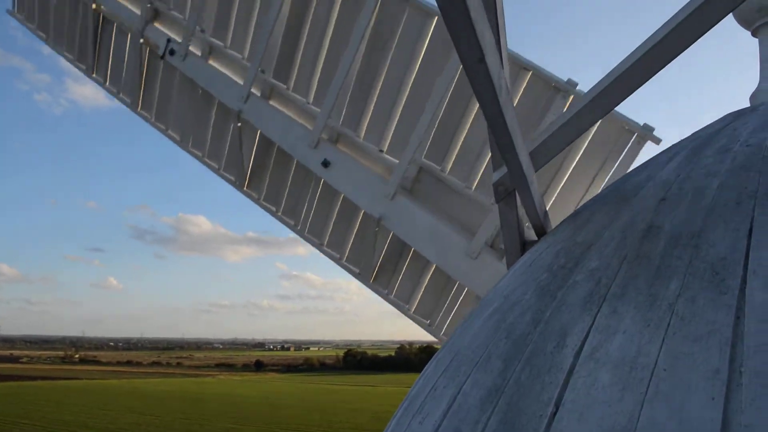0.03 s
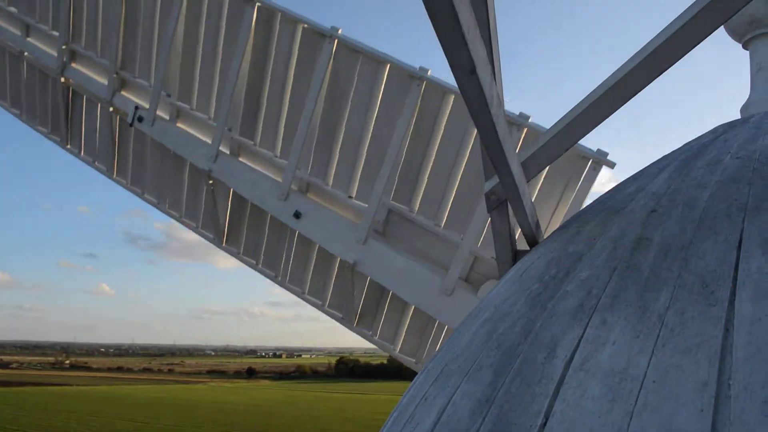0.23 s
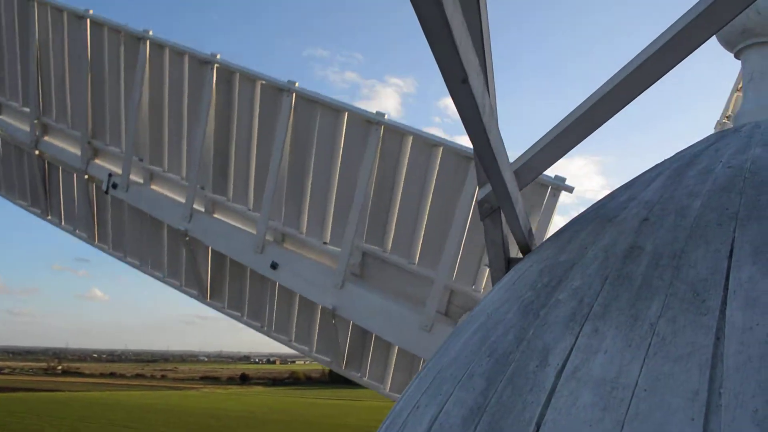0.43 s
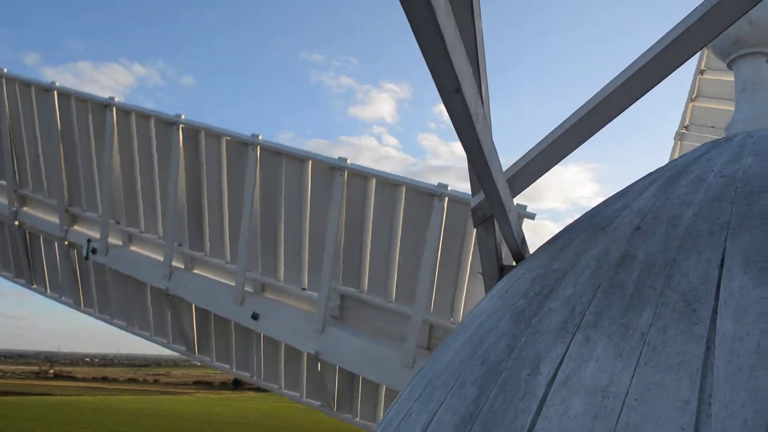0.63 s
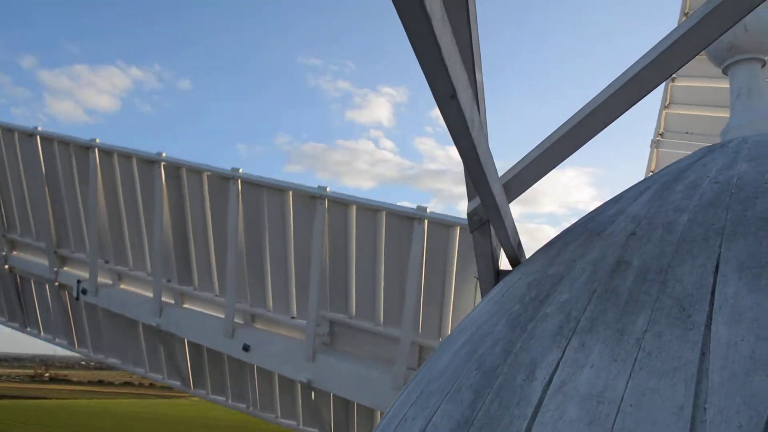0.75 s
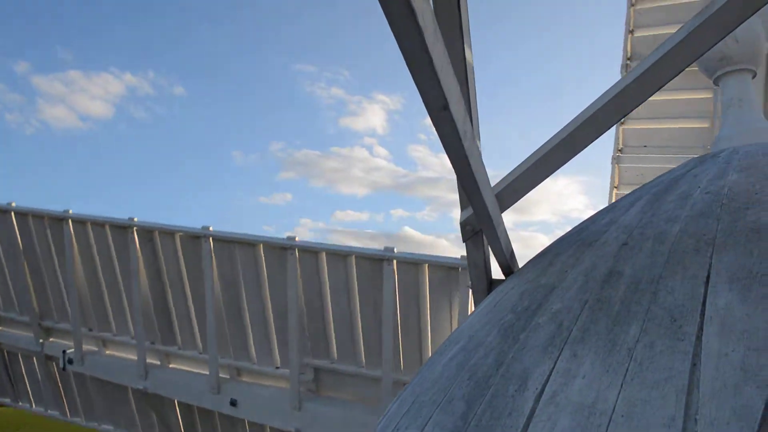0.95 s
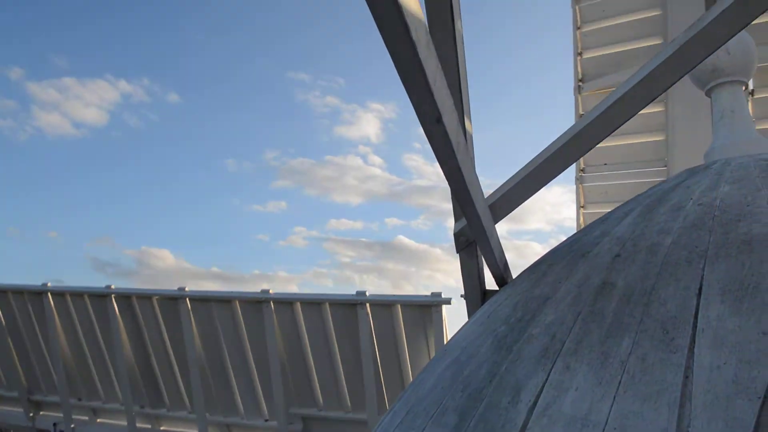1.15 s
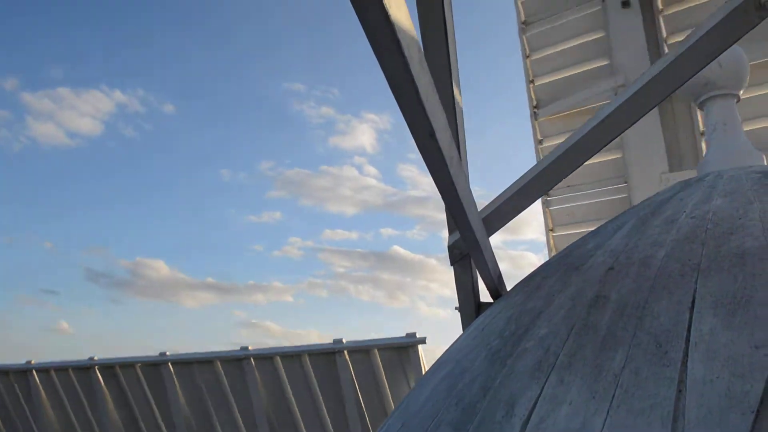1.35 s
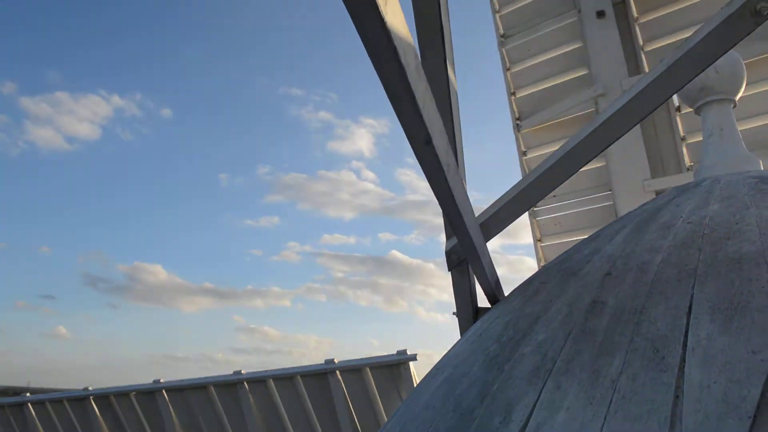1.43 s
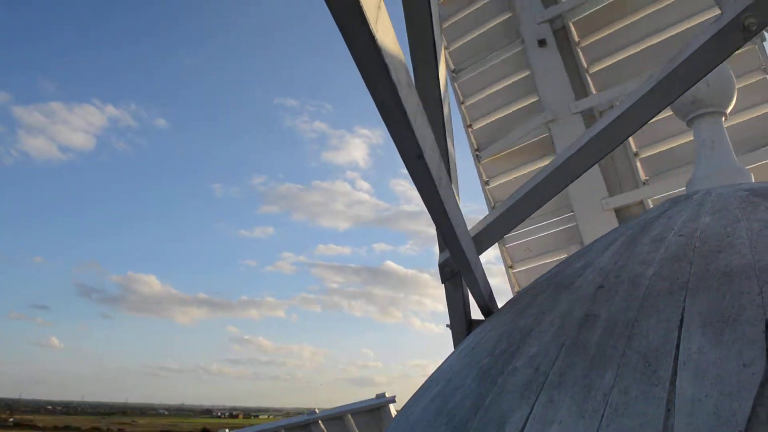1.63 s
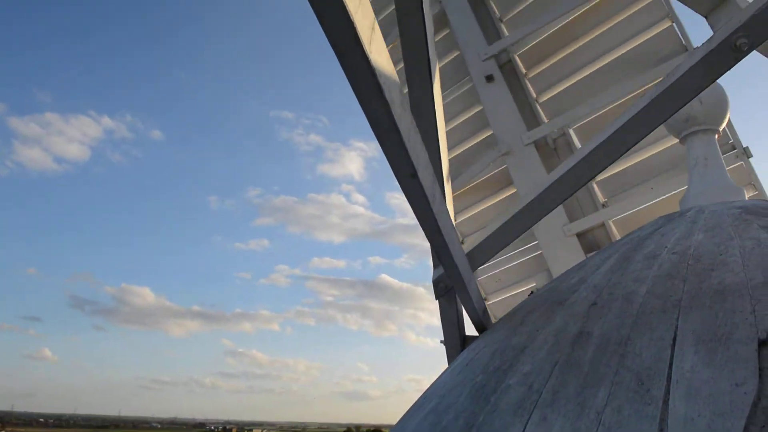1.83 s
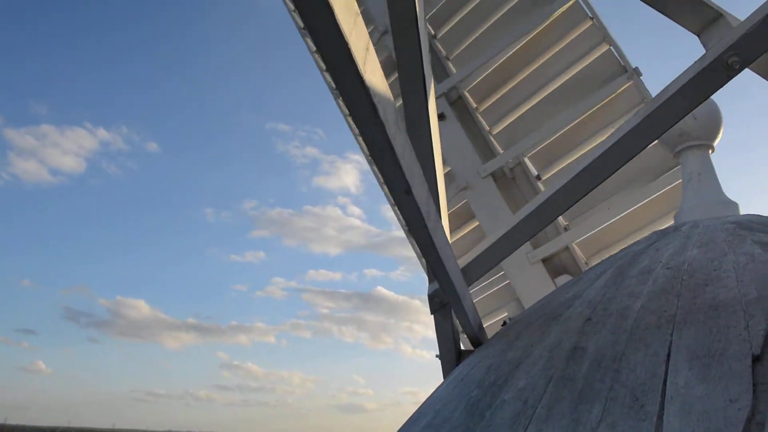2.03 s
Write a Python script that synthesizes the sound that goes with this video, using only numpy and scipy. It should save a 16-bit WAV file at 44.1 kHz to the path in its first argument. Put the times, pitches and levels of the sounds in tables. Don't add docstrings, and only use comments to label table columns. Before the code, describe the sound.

Strong wind rumbling and thumping on a microphone high on a windmill, small mechanism ticks behind

```python
import sys
import numpy as np
from scipy import signal
from scipy.fft import rfft, irfft, next_fast_len
from scipy.io import wavfile
from scipy.ndimage import uniform_filter1d

SR = 44100
rng = np.random.default_rng(int(sys.argv[2]) if len(sys.argv) > 2 else 0)


def field_ratio(decibels):
    return 10 ** (np.asarray(decibels, dtype=float) / 20)


def put_to_file(sound):
    columns = np.atleast_2d(sound).T
    safe = np.clip(columns, -1, 1)
    whole_steps = np.round(safe * 32767)
    wavfile.write(sys.argv[1], SR, whole_steps.astype(np.int16))


N = 92610

# (frequency [Hz], density [dB per Hz])
AIR_SPECTRUM = [(12, -60.5), (40, -10.5), (142, -6.5), (255, -8.5), (337, -9.5), (698, -10), (923, -7),
                (1260, -12), (16000, -47)]
# (frequency [Hz], correlation [0-1])
PORT_LIKENESS = [(60, .1), (130, .4), (290, 0.96), (640, 0.94), (1410, 0.9), (3100, 0.35), (6820, 0.35),
                 (15000, .05)]
# (pitch ratio [1], level [dB], half length [cycles of the eddy])
WHIRLS = [(.62, -4.5, 0.87), (1.01, -2, 0.9), (1.6, -8, 0.8), (2.3, -18, 0.41), (3.2, -30.5, 0.83)]
# (time [s], level [dB])
GUST_STRENGTH = [(0, -35.5), (.16, -32.5), (.185, -63.5), (.21, -10.5), (.272, -19), (.29, -31),
                 (.375, -34), (.395, -18.5), (.45, -25.5), (.475, -13.5), (.522, -15.5), (.532, -26),
                 (.8, -39.5), (.905, -41.5), (.93, -25.5), (1.15, -37.5), (1.18, -39.5), (1.65, -51.5)]
# (time [s], level [dB], pitch [Hz])
MAIN_LEFT = [(0.062, -21, 208), (0.2097, 0, 409), (0.2242, 0.5, 442), (0.2383, -3.5, 714), (0.269, -2, 428),
             (0.292, -10.5, 279), (0.315, -7, 412), (0.351, -13.5, 395), (0.396, -11, 379),
             (0.409, -13.5, 350), (0.4726, 1.5, 520), (0.4915, 5, 400), (0.512, -11.5, 720),
             (0.521, -8, 470), (0.572, -8, 378), (0.661, -23.5, 196), (0.738, -28, 520),
             (0.771, -14.5, 187), (0.793, -25, 225), (0.9285, -10.5, 260), (0.951, -19, 500),
             (0.97, -19, 230), (0.988, -16, 485), (1.065, -15, 210), (1.117, -17.5, 190),
             (1.133, -11.5, 420), (1.1435, -8.5, 250), (1.192, -25.5, 184), (1.361, -21, 144),
             (1.448, -13.5, 225)]
MAIN_RIGHT = [(0.049, -28.5, 247), (0.068, -23, 276), (0.121, -22, 215), (0.216, -8, 392), (0.227, 2, 452),
              (0.2465, 1.5, 467), (0.276, -11, 390), (0.305, -19.5, 314), (0.317, -15.5, 176),
              (0.33, -14.5, 196), (0.4, -13.5, 500), (0.4794, -2.5, 514), (0.4944, 1.5, 593),
              (0.5218, 0.5, 600), (0.582, -12.5, 454), (0.616, -22, 202), (0.652, -17, 300),
              (0.737, -13, 395), (0.755, -24, 276), (0.801, -17.5, 259), (0.929, -6.5, 329),
              (0.946, -6.5, 327), (0.967, -13.5, 390), (0.998, -11, 380), (1.067, -19, 260),
              (1.09, -12.5, 228), (1.131, -6, 200), (1.151, -5.5, 310), (1.422, -27, 239),
              (1.446, -22.5, 200)]
# (time [s], level [dB], pitch [Hz])
FURTHER_LEFT = [(0.025, -27, 221), (0.082, -28, 315), (0.114, -26, 226), (0.139, -22.5, 330),
                (0.16, -21, 292), (0.2136, -7, 520), (0.254, -5.5, 420), (0.26, -4.5, 450), (0.465, -5, 354),
                (0.4752, -4.5, 503), (0.549, -21, 210), (0.583, -30, 447), (0.605, -25, 298),
                (0.707, -20, 174), (0.807, -24.5, 227), (0.839, -27, 362), (0.865, -31.1, 179),
                (1.029, -28, 187), (1.0638, -17.5, 660), (1.091, -26, 200), (1.151, -18.5, 517),
                (1.222, -33.5, 175), (1.284, -29, 160), (1.308, -27.5, 168), (1.52, -31, 94),
                (1.576, -33.5, 110), (1.736, -30, 187)]
FURTHER_RIGHT = [(0.033, -31, 182), (0.087, -28, 270), (0.154, -35, 268), (0.259, -14, 362),
                 (0.341, -19, 162), (0.438, -24, 250), (0.45, -25, 272), (0.466, -20, 392), (0.4764, 2, 538),
                 (0.5017, 2.5, 918), (0.513, -11.5, 570), (0.675, -38, 200), (0.856, -27, 234),
                 (0.933, -10.5, 503), (0.952, -16.5, 620), (0.989, -14.5, 420), (1.055, -25, 224),
                 (1.114, -15.5, 170), (1.23, -39, 150), (1.265, -29, 200), (1.302, -30.5, 156),
                 (1.338, -31, 152), (1.355, -30, 141), (1.472, -36, 200), (1.553, -34, 90),
                 (1.735, -30.5, 167), (1.853, -33, 192)]
# (time [s], peak level [dB], tooth contact [0 sharp - 1 blunt])
TICKS = [
    (0.176, -33.5, 0.86),
    (.5522, -32, .1),
    (.5566, -20.5, 0.83),
    (.667, -40, 0.9),
    (1.0941, -33.5, .1),
    (1.099, -26, 0.71),
    (1.375, -43, 0.73),
    (1.4356, -36, 1),
    (1.7543, -27, 0.33),
    (2.015, -37.5, 0.61),
]
# (frequency [Hz], level if sharp [dB], level if blunt [dB], T60 [s])
GEAR_MODES = [(2020, -6, -6.5, 0.012), (3340, -3, -9.5, 0.0083), (4480, -1, -6.5, 0.0069),
              (4970, -13, 2.5, 0.0041), (6000, -19, -17, 0.0065), (8400, -21, -33, .004),
              (10800, -24, -33.5, 0.005), (12500, -25, -34.5, 0.003)]
# (frequency [Hz], density [dB per Hz])
SNAP_SPECTRUM = [(1200, -31), (2000, -1), (2800, -1), (5000, -6), (6500, -20), (9000, -9.5), (13000, -13.5),
                 (15500, -25.5)]
# (frequency [Hz], density [dB per Hz])
SWISH_SPECTRUM = [(1500, -47), (2800, -2.5), (3700, 7.5), (6000, -10), (12000, -15), (14500, -32)]

AIR_DB = -46.5
CHURN_PER_S, CHURN_SCATTER_DB, CHURN_SPREAD, CHURN_CYCLES = 330, 4, 0.16, 1.54
CHURN_HZ, DB_PER_OCTAVE = 200, 16.5
EDDY_CYCLES, EDDY_SPREAD, EDDY_OVER_DB = 1.21, 0.079, 3
LONGER_WHEN_LOW = 0.8
PHASE_SCATTER_RAD = 0.98
PUSH_DB, PUSH_RATIO = -14, 0.27
TICK_RISE_S = 0.0005
SNAP_DB, SNAP_T60_S, SNAP_BLUNT_HZ = -10, 0.0066, 5000
SWISH_S, SWISH_DB, SWISH_ATTACK_S, SWISH_T60_S = 0.345, -50.5, 0.011, 0.51
LOW_CUT_HZ, CLIP_HARDNESS, TOP_HZ = 70, 60, 15850
WHINE_HZ, WHINE_DB = 15734, -92


def unit(x):
    return x / np.sqrt(np.mean(x ** 2) + 1e-20)


def along(points, hz):
    f, value = np.transpose(points)
    return np.interp(np.log(hz + 1), np.log(f + 1), value)


def filtered(x, response):
    m = next_fast_len(N + 8192)
    return irfft(rfft(x, m) * response(np.fft.rfftfreq(m, 1 / SR)), m)[..., :N]


def rush(spectrum, patchy_db):
    z = signal.stft(rng.standard_normal((2, N)), nperseg=512)[2]
    patches = uniform_filter1d(rng.standard_normal(z.shape[1:]), 6, 0)
    patches = unit(uniform_filter1d(patches, 12, 1))
    pair = signal.istft(z * field_ratio(patchy_db * patches), nperseg=512)[1][:, :N]

    def mid_side(hz):
        angle = np.arccos(np.clip(along(PORT_LIKENESS, hz), -1, 1)) / 2
        return field_ratio(along(spectrum, hz)) * [np.cos(angle), np.sin(angle)]

    mid, side = filtered(pair, mid_side)
    return unit(np.array([mid + side, mid - side]))


def wobbles(s, db, hz, cycles, spread, scatter, half=700):
    k = np.arange(-half, half)
    draw = rng.standard_normal((len(s), 3, len(WHIRLS), 1))
    turns = hz[:, None] * k / SR
    wave = np.zeros(turns.shape)
    for j, (ratio, level, length) in enumerate(WHIRLS):
        pitch = ratio * np.exp(spread * draw[:, 0, j])
        phase = 2 * np.pi * turns * pitch + scatter * draw[:, 1, j]
        bell = np.exp(-0.5 * ((turns - 0.22 * draw[:, 2, j]) / (cycles * length)) ** 2)
        wave -= field_ratio(level) * np.cos(phase) * bell
    wave *= np.hanning(2 * half)
    wave *= (field_ratio(db) / np.abs(wave).max(1))[:, None]
    at = np.round(s * SR).astype(int)[:, None] + k + half
    return np.bincount(at.ravel(), wave.ravel(), N + 2 * half)[half:N + half]


def churn():
    draw = rng.random((800, 3))
    s = np.cumsum(0.4 - 0.6 * np.log(draw[:, 0])) / CHURN_PER_S
    inside = s < N / SR
    draw, s = draw[inside], s[inside]
    strength = np.interp(s, *np.transpose(GUST_STRENGTH))
    db = strength + CHURN_SCATTER_DB * (1 - 4 * draw[:, 1])
    octaves = (strength + 35) / DB_PER_OCTAVE + 0.96 * (draw[:, 2] - 0.5)
    return wobbles(s, db, CHURN_HZ * 2 ** octaves, CHURN_CYCLES, CHURN_SPREAD, np.pi, half=500)


def eddies(rows):
    s, db, hz = np.transpose(rows)
    cycles = EDDY_CYCLES * (300 / hz[:, None]) ** LONGER_WHEN_LOW
    burst = wobbles(s, db + EDDY_OVER_DB, hz, cycles, EDDY_SPREAD, PHASE_SCATTER_RAD)
    push = wobbles(s, db + PUSH_DB, hz * PUSH_RATIO, 0.44, 0.21, np.pi, half=1400)
    return burst + push


def ticks():
    out, t = np.zeros(N + SR), np.arange(2000) / SR
    for s, db, blunt in TICKS:
        ring = np.zeros(len(t))
        for hz, sharp_db, blunt_db, t60 in GEAR_MODES:
            mode_db = sharp_db + blunt * (blunt_db - sharp_db) - 60 * t / t60
            ring += field_ratio(mode_db) * np.sin(2 * np.pi * (hz * t + rng.random()))
        out[round(s * SR):][:len(t)] += field_ratio(db - 3) * ring * (1 - np.exp(-t / TICK_RISE_S))
    return out[:N]


def snaps():
    sharp, dull, t = np.zeros(N + SR), np.zeros(N + SR), np.arange(600) / SR
    for s, db, blunt in TICKS:
        envelope = field_ratio(db + SNAP_DB - 60 * t / SNAP_T60_S) * (1 - np.exp(-t / TICK_RISE_S))
        crack = envelope * rng.standard_normal(len(t))
        sharp[round(s * SR):][:len(t)] += (1 - blunt) * crack
        dull[round(s * SR):][:len(t)] += blunt * crack

    def colour(hz):
        return field_ratio(along(SNAP_SPECTRUM, hz) + 9)

    def dull_colour(hz):
        return colour(hz) / (1 + (hz / SNAP_BLUNT_HZ) ** 4)

    return filtered(sharp[:N], colour) + filtered(dull[:N], dull_colour)


def swish():
    t = np.maximum(np.arange(N) / SR - SWISH_S, 0)
    envelope = field_ratio(SWISH_DB - 60 * t / SWISH_T60_S) * (1 - np.exp(-t / SWISH_ATTACK_S))
    return envelope * rush(SWISH_SPECTRUM, patchy_db=4.5)


def scene():
    air = field_ratio(AIR_DB) * rush(AIR_SPECTRUM, patchy_db=0.6)
    left = churn() + eddies(MAIN_LEFT + FURTHER_LEFT)
    right = churn() + eddies(MAIN_RIGHT + FURTHER_RIGHT)
    return air + np.array([left, right]) + ticks() + snaps() + swish()


def low_pass(x):
    return signal.sosfilt(signal.butter(12, 16270, fs=SR, output="sos"), x)


def record(dry):
    x = filtered(dry, lambda hz: (1j * hz / (LOW_CUT_HZ + 1j * hz)) ** 2)
    x = x / (1 + np.abs(x) ** CLIP_HARDNESS) ** (1 / CLIP_HARDNESS)
    whine = field_ratio(WHINE_DB) * np.sin(2 * np.pi * WHINE_HZ * np.arange(N) / SR)
    mix = filtered(x + whine, lambda hz: hz < TOP_HZ)
    return low_pass(mix)


dry = scene()
out = record(dry)
put_to_file(out)
```